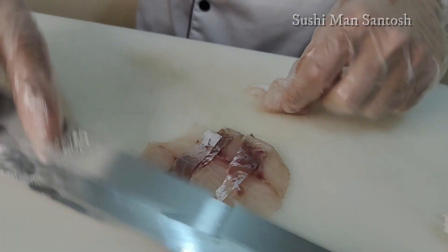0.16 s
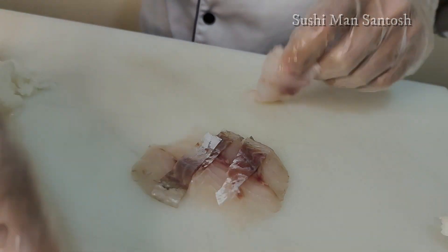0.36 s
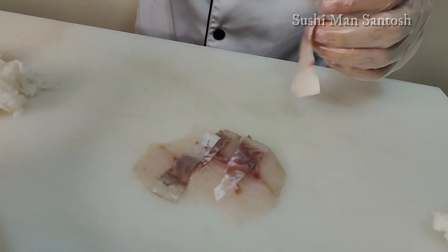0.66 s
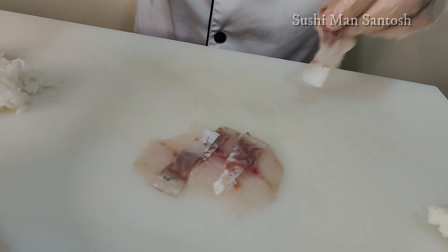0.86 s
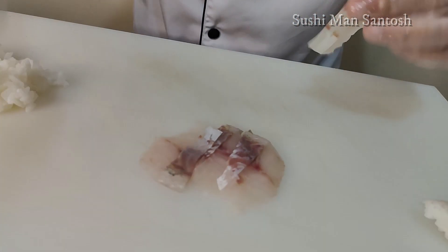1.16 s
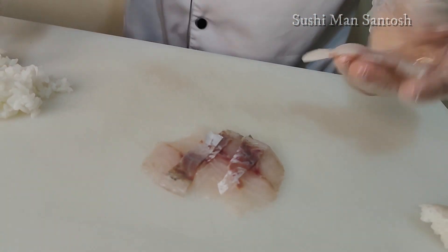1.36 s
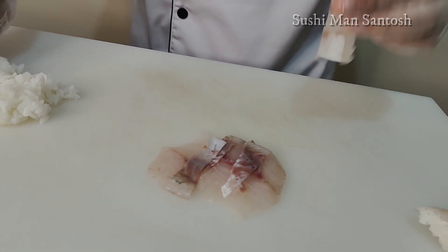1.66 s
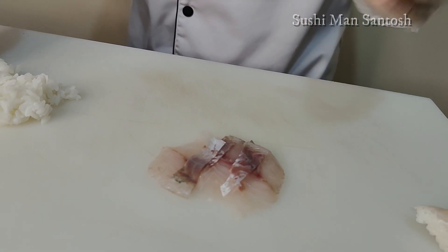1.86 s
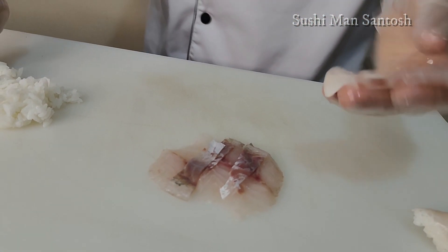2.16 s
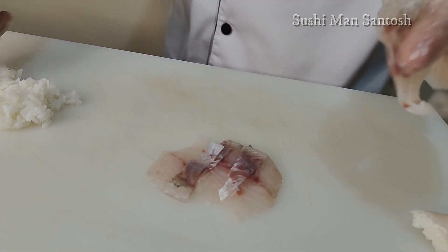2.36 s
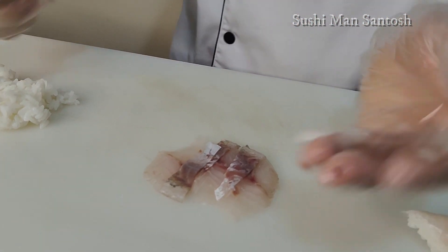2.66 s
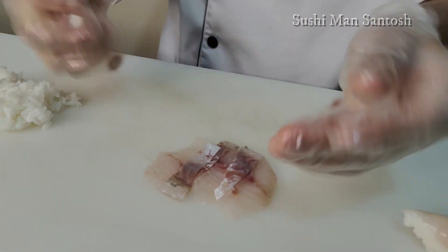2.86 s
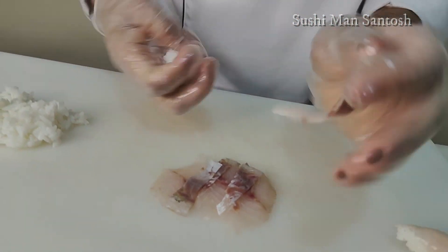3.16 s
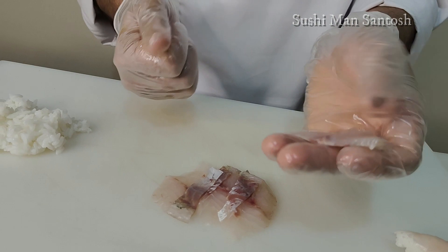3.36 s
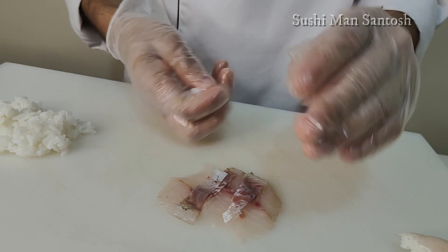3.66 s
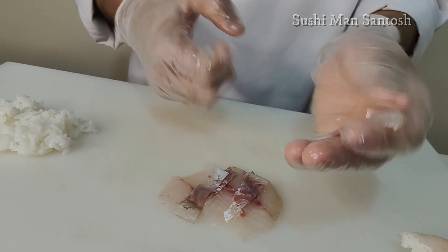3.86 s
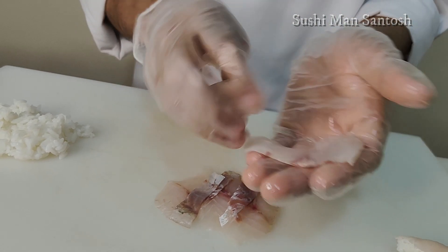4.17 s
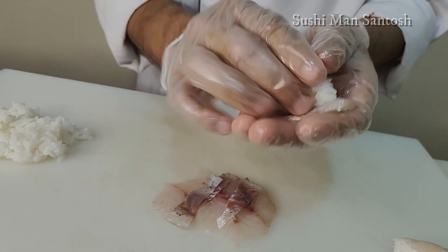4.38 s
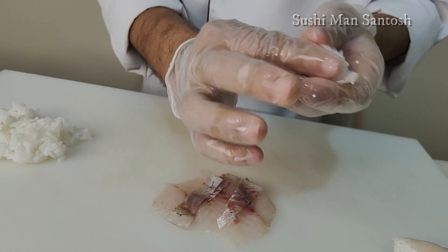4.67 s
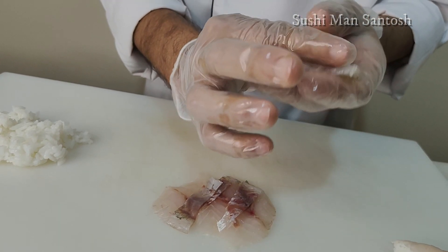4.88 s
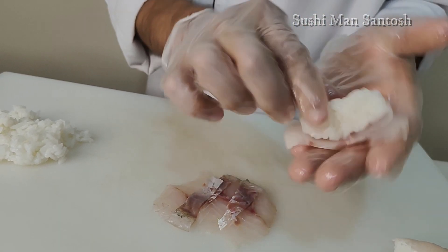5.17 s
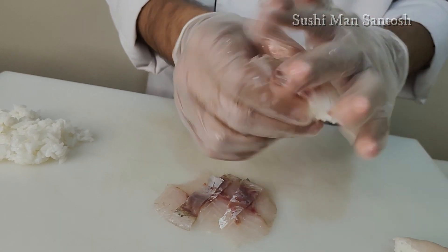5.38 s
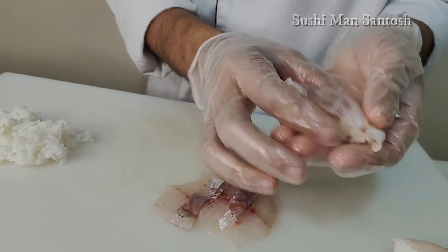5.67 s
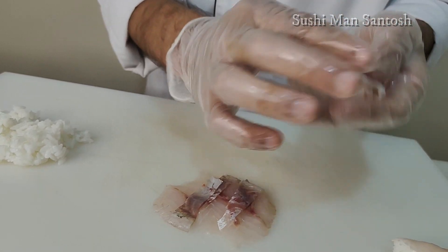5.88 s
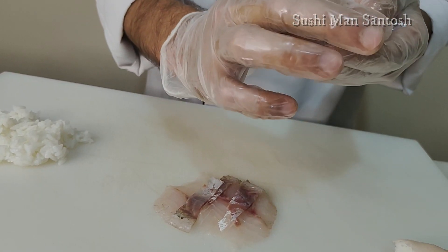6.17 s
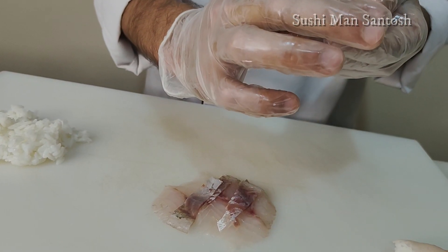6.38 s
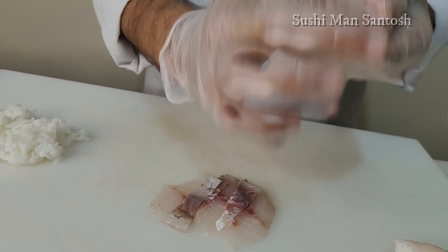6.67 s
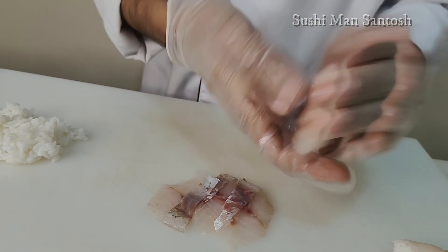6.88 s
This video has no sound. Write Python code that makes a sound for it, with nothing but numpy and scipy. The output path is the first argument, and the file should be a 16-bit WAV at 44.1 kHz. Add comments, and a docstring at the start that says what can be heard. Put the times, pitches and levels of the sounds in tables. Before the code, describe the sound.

Steel taps and a ringing clatter as a knife is laid on a board, followed by quiet crinkling of gloved hands shaping food.

```python
"""In a small tiled kitchen, machines hum far away and the walls give a short echo.
A cook shifts a long knife and lays it on a cutting board to the left: each touch makes the steel
and the board ring, until the knife rocks to rest. Then the cook shapes rice and fish in thin, wet
plastic gloves, which rub, crackle and squelch, while palms and sleeves brush dully over the board."""
import sys
import numpy as np
from scipy import signal
from scipy.fft import rfft, irfft, next_fast_len
from scipy.io import wavfile
from scipy.ndimage import uniform_filter1d, map_coordinates

SR = 44100
rng = np.random.default_rng(int(sys.argv[2]) if len(sys.argv) > 2 else 0)


def store_wav(level_fs):
    """Save 16-bit WAV to argv[1]."""
    pcm = np.round(np.clip(np.atleast_2d(level_fs), -1, 1) * 32767)
    wavfile.write(sys.argv[1], SR, pcm.T.astype(np.int16))


N = 310023

# The faint sound of hands that never quite rest: t/s, glove rustle/dB, dull brushing/dB
RESTLESS_HANDS = [(0, -76.5, -73.5), (.7, -73.5, -73), (1.1, -64, -64.5), (1.32, -66.5, -68.5),
                  (1.39, -79, -75), (1.45, -69, -66.5), (2.06, -71.5, -69.5), (2.25, -68, -67.5),
                  (2.6, -61, -58.5), (2.95, -70, -63), (3.1, -75, -69), (3.75, -72.5, -68),
                  (4.2, -77.5, -68.5), (4.9, -82, -68.5), (5.2, -68.5, -66.5), (5.75, -83.5, -69.5),
                  (6.4, -86, -72.5), (7.03, -67.5, -65)]


def amp(db):
    """Turns decibels into a factor to multiply by."""
    return 10 ** (np.asarray(db) / 20)


def unit(x):
    """Scales a signal to an average strength (rms) of 1."""
    return x / np.sqrt(np.mean(x ** 2) + 1e-20)


def along(points, hz):
    """Reads between (f/Hz, value) points on a logarithmic frequency scale."""
    freqs, values = np.transpose(points)
    return np.interp(np.log(hz + 1), np.log(freqs + 1), values)


def curves(rows):
    """Joins timed rows with straight lines: one curve for each column after the time."""
    times, *columns = np.transpose(rows)
    return [np.interp(np.arange(N) / SR, times, column) for column in columns]


def wobble(rate):
    """A smooth random curve with `rate` new values a second."""
    return map_coordinates(rng.standard_normal(int(N * rate / SR) + 4), [np.arange(N) * rate / SR])


def filtered(x, response):
    """Multiplies each frequency in x by response(hz)."""
    size = next_fast_len(N + SR // 2)
    return irfft(rfft(x, size) * response(np.fft.rfftfreq(size, 1 / SR)), size)[..., :N]


def rush(gain, alike, source=None):
    """Stereo noise shaped by gain(hz); `alike` lists f/Hz, left-right likeness (1 = the same)."""
    pair = rng.standard_normal((2, N)) if source is None else source
    turn = lambda hz: np.arccos(np.clip(along(alike, hz), -1, 1)) / 2
    mid, side = filtered(pair, lambda hz: gain(hz) * [np.cos(turn(hz)), np.sin(turn(hz))])
    return unit(np.array([mid + side, mid - side]))


def colour(points):
    """Turns (f/Hz, level/dB) points into a gain for every frequency."""
    return lambda hz: amp(along([(0.98, -120)] + list(points) + [(SR / 2, -90)], hz))


def sides(pan_db):
    """Left and right gains, with the left louder by pan_db."""
    return amp(np.array([pan_db / 2, -pan_db / 2]))


def add(track, start, sound):
    """Mixes a short sound in at `start` seconds."""
    track[..., round(start * SR):][..., :sound.shape[-1]] += sound


def swells(rows, fade_stretch=1.04):
    """Movements swell and fade a little more slowly: gains for a layer and for its second part."""
    t, main, part = np.arange(N) / SR, np.zeros(N), np.zeros(N)
    for peak, db, rise, part_db in rows:
        bell = amp(db) * np.exp(-((t - peak) / np.where(t < peak, rise, fade_stretch * rise)) ** 2)
        main += bell
        part += amp(part_db) * bell
    return main, part


def background(hum_hz=49.43, waver_db=2.5, whine_db=-74.5, whine_heard_s=2.4):
    """A far hum, a rush of air, a low rumble and, from about 2.4 s, a faint whine near 1 kHz."""
    # Level of the low hum and rumble, swelling around knocks and handling:
    # t/s, hum before scaling/dB, rumble/dB
    low_levels = [(0.0, -79, -79), (0.72, -66.5, -77.5), (0.9, -60.5, -57), (1.41, -66, -83.5),
                  (1.59, -55.5, -77), (2.23, -70.5, -83), (2.64, -56.5, -79.5), (3.72, -69.5, -83),
                  (4.01, -76, -92.5), (4.15, -67.5, -70), (4.86, -69, -89), (5.25, -69, -76.5),
                  (5.83, -74.5, -85.5), (6.83, -70, -82.5), (7.03, -88, -72)]
    # The hum's tones: multiple of its base pitch, relative level/dB
    harmonics = [(3, -2.5), (4, 3.5), (5, -8), (6, -9), (9, -8), (12, -2.5), (15, -7.5), (20, -8),
                 (24, -11)]
    # Tone colours of the air and the rumble: f/Hz, relative level/dB
    air_colour = [(90, -24), (150, -11), (200, -2), (300, -6), (470, -15), (600, -10), (850, -21),
                  (990, -12.5), (1200, -15.5), (1350, -25), (2500, -25.5), (7000, -47.5), (15500, -59.5)]
    rumble_colour = [(20, -18.5), (35, 0.5), (50, -3), (80, -7), (110, -32)]
    # How alike the air sounds on both sides: f/Hz, likeness
    air_likeness = [(60, 0.6), (180, 0.15), (550, 0.25), (1650, 0.08), (4970, 0.1), (15000, 0.039)]
    # The whine's narrow bands: f/Hz, width/Hz, relative level/dB
    bands = [(910, 12, -2), (990, 28, 0), (1180, 10, -3)]
    hum_db, rumble_db = curves(low_levels)
    turns = np.cumsum(hum_hz * (1 + 0.00327 * wobble(4.4))) / SR
    tones = np.zeros((2, N))
    for k, db in harmonics:
        strength = amp(db + waver_db * wobble(12.0))
        tones += strength * np.sin(2 * np.pi * k * turns + 1.6 * rng.standard_normal((2, 1)) * k / 12)
    hum = amp(-71 + 0.65 * (hum_db + 69.0)) * unit(tones)
    air_db = -71.5 + 0.59 * (hum_db + 64.5) + 0.61 * wobble(5.4)
    air = amp(air_db) * rush(colour(air_colour), air_likeness)
    whine_peaks = lambda f: sum(amp(db) / (1 + ((f - hz) / width) ** 2) for hz, width, db in bands)
    whine = amp(whine_db) * rush(whine_peaks, alike=[(1000, 0.27)])
    whine /= 1 + np.exp((whine_heard_s - np.arange(N) / SR) / 0.099)
    rumble = amp(rumble_db) * rush(colour(rumble_colour), alike=[(50, 0.39)])
    return air + whine + hum + rumble


def room(x):
    """The tiled walls throw sound back; each frequency dies away at its own speed."""
    # How long the echo lasts: f/Hz, time to fade by 60 dB/s
    echo_times = [(200, 0.59), (1000, 0.19), (4000, 0.21), (12000, 0.24)]
    hz, t, noise = signal.stft(rng.standard_normal((2, SR // 2)), SR, nperseg=256)
    tail = signal.istft(noise * amp(-60 * t / along(echo_times, hz)[:, None]), SR, nperseg=256)[1]
    delayed = np.pad(x, ((0, 0), (150, 0)))
    echo = signal.fftconvolve(delayed, tail / np.linalg.norm(tail[0]), axes=1)[:, :N]
    return filtered(echo, lambda f: (1j * f / (250 + 1j * f)) ** 2)  # little bass in the echo


def brushing(steady_low_db=-3.5):
    """Palms and sleeves drag with a lumpy, dull noise; soft bumps give a short knock."""
    # Drags over the board: peak t/s, level/dB, swell time/s, low part relative to the level/dB
    drags = [(.01, -74.5, 0.037, 10), (.2, -65.5, 0.035, 8.5), (.42, -52.5, 0.053, -5),
             (.58, -62.5, 0.041, 7.5), (1.05, -60, 0.021, 9.5), (1.5, -86, 0.057, 16),
             (1.953, -57.5, 0.022, -17), (1.99, -63, 0.031, -5), (2.595, -69, 0.023, 1),
             (2.98, -72, 0.065, 4.5), (3.56, -62, 0.079, -1), (4.41, -69.5, 0.064, -6),
             (5.09, -68, 0.041, -8), (6.95, -68, 0.035, 0)]
    # Knuckles, palms and the handle bump the board: t/s, level/dB, f/Hz, time to fade by 60 dB/s
    bumps = [(.534, -52.5, 940, 0.3), (0.884, -39, 119, 0.094), (.995, -40, 159, 0.14),
             (1.29, -56.5, 248, 0.087), (1.422, -45.5, 1330, 0.033), (1.456, -44.5, 190, 0.075),
             (1.942, -49.5, 518, 0.079), (1.981, -51, 202, 0.18), (2.956, -48, 413, 0.057),
             (2.969, -41.5, 342, 0.037), (2.986, -42, 320, 0.056), (3.549, -51.5, 460, 0.097)]
    # Tone colours of palm and sleeve: f/Hz, relative level/dB
    palm_colour = [(300, -20.5), (500, -1), (1000, -2.5), (1400, -9), (2400, -15)]
    cloth_colour = [(90, -14.5), (150, 0.5), (210, -0.5), (400, -3), (600, -23)]
    steady = amp(curves(RESTLESS_HANDS)[1])
    drag, drag_low = swells(drags)
    lumps = unit(amp(1.7 * wobble(40)))
    palm = (steady + drag) * rush(colour(palm_colour), alike=[(800, 0.3)])
    cloth = (amp(steady_low_db) * steady + drag_low) * rush(colour(cloth_colour), alike=[(200, 0.69)])
    knocks, t = np.zeros(N + SR), np.arange(SR // 4) / SR
    for start, db, hz, fade in bumps:
        knock = amp(db - 60 * t / fade) * np.sin(2 * np.pi * hz * t)
        add(knocks, start, knock * (1 - np.exp(-t / 0.0014)))
    return lumps * (palm + cloth) + knocks[:N]


def ticks():
    """Small sharp ticks, light knife taps and glove snaps: a fast-dying tone plus a burst of noise."""
    # Taps and snaps: t/s, level/dB, f/Hz, left minus right/dB
    taps_and_snaps = [(1.006, -42.5, 5240, 6), (1.4203, -46.5, 2610, 10), (2.6833, -56, 4590, 7.5),
                      (2.829, -47, 5370, 21), (4.337, -54, 4500, 2), (5.008, -53, 5500, 2),
                      (5.038, -54.5, 2950, 4.5), (5.049, -55, 3000, 2), (5.0988, -61, 3160, -1),
                      (6.93, -54, 5000, 5), (6.9613, -40.5, 2530, -5), (6.963, -40.5, 5600, 3)]
    out, t = np.zeros((2, N + SR)), np.arange(SR // 50) / SR
    for start, db, hz, pan_db in taps_and_snaps:
        lowpass = signal.butter(2, min(1.1 * hz, SR / 3), fs=SR, output='sos')
        noise = signal.sosfilt(lowpass, rng.standard_normal(len(t)))
        tick = np.sin(2 * np.pi * hz * t) * amp(-60 * t / 0.012) + 2.1 * noise * amp(-60 * t / 0.0037)
        add(out, start, amp(db) * sides(pan_db)[:, None] * tick * (1 - np.exp(-t / 0.0001)))
    return out[:, :N]


def scrapes_and_squelches(left_above_hz=3100, left_db_per_octave=18.5):
    """Short swells of grainy, pitched noise: knife scrapes and hiss, then glove squelches."""
    # The swells: middle t/s, level/dB, centre pitch/Hz, length/s, width as a share of the pitch
    events = [(0.176, -45.5, 1210, 0.017, 0.14), (0.307, -68, 2570, 0.13, 0.22),
              (0.358, -70, 6600, 0.15, 0.23), (0.417, -50, 1020, 0.032, 0.062),
              (.439, -42.5, 1065, 0.022, 0.067), (.44, -53.5, 1760, 0.03, 0.14),
              (0.813, -63, 5480, 0.12, .16), (1.009, -53, 4440, .05, 0.83),
              (1.699, -60.5, 3280, 0.13, 0.16), (1.706, -62.5, 5800, 0.093, 0.18),
              (1.955, -54.5, 1040, 0.019, 0.46), (1.957, -56, 2250, 0.042, 0.29),
              (2.131, -70.5, 6300, 0.066, 0.3), (2.247, -70.5, 7100, 0.077, 0.22),
              (2.45, -62, 6800, 0.15, 0.26), (2.567, -59, 3800, 0.031, 0.13),
              (2.631, -67, 6460, 0.052, 0.12), (2.694, -47.5, 4800, 0.034, 0.18),
              (2.702, -55.5, 3280, 0.04, 0.07), (2.819, -51, 4470, 0.042, 0.4),
              (2.912, -59, 5830, 0.032, 0.28), (3.558, -70, 6770, 0.073, 0.18),
              (4.394, -67.5, 5550, 0.045, 0.074), (4.406, -56, 3020, 0.057, 0.16),
              (5.023, -64.5, 5800, 0.035, 0.15), (5.044, -53, 3120, 0.03, 0.12),
              (5.091, -57, 3050, 0.023, 0.11), (5.699, -61, 3010, 0.034, 0.18),
              (6.737, -66.5, 2100, 0.043, 0.18), (6.931, -49.5, 4960, 0.033, 0.46),
              (6.945, -53, 2960, 0.012, .06)]
    out, hz = np.zeros((2, N + SR)), np.fft.rfftfreq(SR // 2, 1 / SR)
    for middle, db, centre_hz, length, width in events:
        pan_db = left_db_per_octave * max(np.log2(centre_hz / left_above_hz), 0)  # high ones lean left
        t = np.arange(round(3 * length * SR)) / SR
        mid, side, roughness = rng.standard_normal((3, SR // 2))
        grain = amp(2.8 * unit(uniform_filter1d(roughness, size=70)))
        pair = np.array([mid + 0.61 * side, mid - 0.44 * side]) * grain
        band = unit(irfft(rfft(pair) / (1 + ((hz - centre_hz) / (width * centre_hz)) ** 2)))
        swell = np.exp(-((t - 1.484 * length) / (0.55 * length)) ** 2)
        add(out, middle - 1.5 * length, amp(db) * sides(pan_db)[:, None] * swell * band[:, :len(t)])
    return out[:, :N]


def gloves(rustle_hiss_db=-16.5):
    """Wet plastic slips in clumps of tiny grains; crinkles start suddenly and fade."""
    # Glove strokes: peak t/s, level/dB, swell time/s, hiss relative to the level/dB
    strokes = [(.01, -62.5, 0.017, -20), (.19, -63, 0.045, -29), (.38, -67, 0.087, -10),
               (.69, -69, 0.011, -24), (.8, -76, 0.075, -13), (1.29, -72, 0.033, -17),
               (1.72, -59, 0.022, -22), (1.93, -63, 0.1, -15.5), (2.25, -84, 0.1, -2),
               (2.45, -65, 0.13, -11), (2.64, -64, 0.2, -20), (2.82, -60, 0.033, -5),
               (2.9, -60.5, 0.034, -13), (2.99, -64, 0.0095, -11), (3.22, -64.5, 0.052, -15.5),
               (3.44, -66.5, 0.035, -19.5), (3.56, -67, 0.059, -10.5), (3.66, -67, 0.018, -11.5),
               (3.88, -73, 0.023, -11), (4.01, -64.5, 0.034, -11.5), (4.315, -66, 0.025, -1.5),
               (4.41, -62, 0.048, -16), (4.69, -72, 0.049, -27), (4.805, -65, 0.021, -18),
               (4.865, -72.5, 0.016, -18), (4.995, -72, 0.016, -12), (5.3, -71, 0.044, -13),
               (5.42, -67.5, 0.016, -10), (6.84, -75.5, 0.057, -12), (6.985, -64, 0.026, -18)]
    # Crinkles of the plastic: t/s, level/dB, length/s, hiss relative to the level/dB
    crinkles = [(1.622, -64.5, 0.13, -19), (3.395, -70, 0.051, -17), (4.996, -60, 0.11, -14),
                (5.559, -65, 0.047, -18), (5.655, -61.5, 0.046, -11.5), (5.918, -78.5, 0.058, -19),
                (6.703, -60, 0.068, -5.5), (6.895, -54, 0.078, -8.5)]
    # Tone colours of the rubbing and its fine hiss: f/Hz, relative level/dB
    rub_colour = [(1000, -17), (2000, 0.5), (3500, 0), (6000, -5), (8000, -8.5), (10000, -42)]
    hiss_colour = [(6000, -22), (8000, -8.5), (10000, 0), (13000, -10.5), (15500, -14)]
    rustle = amp(curves(RESTLESS_HANDS)[0])
    stroke, stroke_hiss = swells(strokes)
    clumps = amp(1.5 * wobble(50) + wobble(20) + 2.6 * wobble(900))
    slips = clumps * rng.standard_normal((2, N))
    rub = rush(colour(rub_colour), alike=[(2000, 0.11), (8000, 0.04)], source=slips)
    hiss = rush(colour(hiss_colour), alike=[(9000, 0.076)], source=slips)
    bursts, t = np.zeros((2, N + SR)), np.arange(SR // 5) / SR
    for start, db, length, hiss_db in crinkles:
        shape = np.exp(-(t / length) ** 6) * (1 - np.exp(-(t / 0.004) ** 2))
        add(bursts, start, amp([[db], [db + hiss_db]]) * shape)
    rub *= rustle + stroke + bursts[0, :N]
    hiss *= amp(rustle_hiss_db) * rustle + stroke_hiss + bursts[1, :N]
    return sides(0.4)[:, None] * (rub + hiss)


def ring(hz, db, fade, t, phase=0, scatter_db=1.2):
    """A struck thing's tones, a little different in strength each time, fall 60 dB in `fade` seconds."""
    strength = amp(db + scatter_db * rng.standard_normal(hz.shape) - 60 * t / fade)
    return strength * np.sin(2 * np.pi * hz * t + phase)


def knife(rest_s=1.024, left_lead_s=0.00035):
    """Every touch rings the blade and the board; the knife stops rocking at rest_s, which mutes both."""
    # Touches: t/s, blade strength/dB, board strength/dB, damping by the hand, brightness/(dB per octave)
    touches = [(0.1644, -42.5, -46.5, 1.74, 3), (.4034, -60, -43.5, 6.1, 5),
               (0.5303, -30.5, -43, 1.5, -5.5), (0.5564, -36, -50.5, 1.48, -5.5),
               (0.5676, -48, -60.5, 2.2, -2), (0.572, -48.5, -60.5, 2.2, 4), (0.6745, -62.5, -68.5, 2, 4.5),
               (0.8665, -21.5, -20, 1.35, 7.5), (.8814, -18.5, -17.5, 1.13, 2.5),
               (.8952, -35, -32.5, 0.63, -3.5), (0.9041, -36.5, -27, 1.2, 3.2),
               (0.9201, -37, -31.5, 1.7, -1.5), (0.9348, -46, -32, 0.84, 3.5), (0.9536, -43, -37, 1.5, 0),
               (.9715, -41, -28.5, 1.73, -1), (1.4212, -80, -49.5, 5, 3.5)]
    # The steel's own tones: f/Hz, relative level/dB, base fade time/s
    blade_tones = [(2295, -14.5, 0.09), (2810, -21.5, 0.33), (3400, -21, 0.26), (3580, -5.5, 0.05),
                   (4225, -6, 0.042), (5150, -7, 0.011), (6220, -1, 0.03), (6040, -15, 0.13),
                   (6770, -1.5, 0.028), (7900, 3, 0.016), (8600, -19, 0.12), (9220, -3, 0.018),
                   (10000, -7, .014), (10500, -1.5, 0.012), (12000, -7.5, .009), (14100, -5, .009)]
    # Tones of board and counter:
    # f/Hz, relative level/dB, base fade time/s, left minus right/dB, left side's head start/rad
    board_tones = [(129, -21, 0.46, 2.5, -0.5), (153.2, -18.5, 0.99, -2, -2.5),
                   (205.2, -21, 0.5, -2.5, -1.9), (413.6, -15, 0.49, -1, 0), (474.6, -2.5, 0.28, 0, 2),
                   (575.8, -3, 0.34, 3.5, -3), (616, -14.5, 0.36, -9.5, -1), (677.6, 2, 0.12, 7.5, -0.5),
                   (842, -11.5, 0.15, -10.5, 1), (931, -5.5, 0.25, 1, 3.5), (970, -9, 0.11, -3, 3.5),
                   (1146, -18.5, 0.067, 2, 2.5), (1136, -5.5, 0.24, -7.5, 3.5), (1220, -20, 0.22, 11, 0),
                   (1350, -18, 0.2, 6, 2.5), (1570.3, -2.5, 0.18, 8.5, 2.7), (1740, -21, 0.11, 4.5, 3),
                   (1980, -20, 0.054, 4, 1.5), (2127, -22.5, 0.14, -3.5, 3), (2495, -18, 0.084, 7.5, 2)]
    blade, board, t = np.zeros((2, N + SR)), np.zeros((2, N + SR)), np.arange(SR // 3) / SR
    steel_hz, steel_db, steel_fade = np.transpose(blade_tones)[:, :, None]
    hz, db, fade, pan_db, lead = np.transpose(board_tones)[:, :, None]
    phases = np.array([lead / 2, -lead / 2])
    facing = (-1) ** np.arange(len(hz))[:, None]  # neighbouring tones start in opposite directions
    for start, blade_db, board_db, damping, bright_db in touches:
        mute = amp(-450 * np.clip(start + t - rest_s, 0, None) * (start < rest_s))
        rattle_shape = amp(-16 - 60 * t / 0.0078) + amp(-38 - 60 * damping * t / 0.16)
        rattle = rng.standard_normal((2, len(t))) * rattle_shape  # the edge rattles on after the touch
        struck = ring(steel_hz, steel_db, steel_fade / damping ** 2, t).sum(0)
        rattle_ring = signal.fftconvolve(rattle, struck[None] * amp(-60 * t / .005), axes=1)[:, :len(t)]
        add(blade, start + 0.0011, amp(blade_db) * (struck + rattle_ring + amp(6) * rattle) * mute)
        tones = facing * ring(hz, db + bright_db * np.log2(hz / 700), 0.77 * fade / damping, t, phases)
        # dull noise stands for the board's many weak tones
        noise = [[1, 0.32], [1, -0.39]] @ rng.standard_normal((2, len(t)))
        thud = amp(-2.0 - 60 * damping * t / 0.31) * uniform_filter1d(noise, size=26)
        knock = np.sum(sides(pan_db) * tones, 1) + thud
        add(board, start - .0012, amp(board_db) * knock * (1 - np.exp(-t / 0.0011)) * mute)
    left_first = lambda f: np.exp(2j * np.pi * np.array([[.5], [-.5]]) * f * left_lead_s)
    bright_band = lambda f: 1j * f / (1800 + 1j * f) / (1 + 1j * f / 7500) ** 2
    blade = filtered(blade, lambda f: left_first(f) * bright_band(f))
    board = filtered(board, lambda f: (1j * f / (110 + 1j * f)) ** 2)  # a board gives off little deep bass
    return board + sides(8)[:, None] * blade


def scene():
    """The nearby knife and hands with their echo, over the kitchen's background."""
    clatter = knife()
    handling = gloves() + scrapes_and_squelches() + ticks() + brushing()
    echo = room(amp(-7.5) * clatter + amp(-6.0) * handling)
    return clatter + handling + echo + background()


def record(dry, top_hz=15700):
    """Cuts away the very highest treble."""
    return filtered(dry, lambda hz: np.clip((top_hz - hz) / 600 + .5, 0, 1) ** 2)


dry = scene()
out = record(dry)
store_wav(out)
```